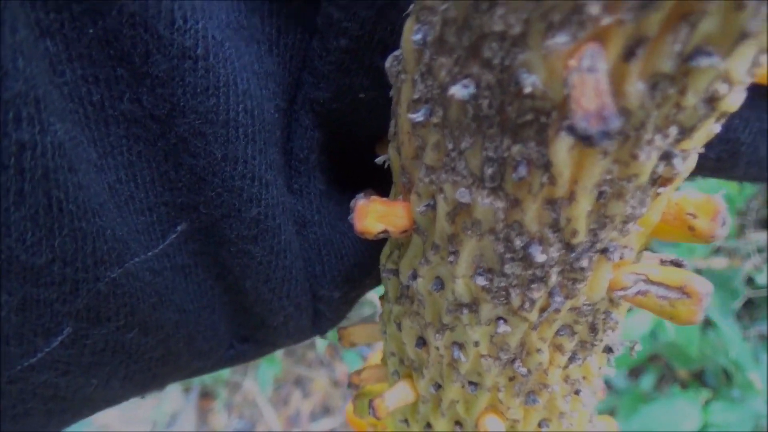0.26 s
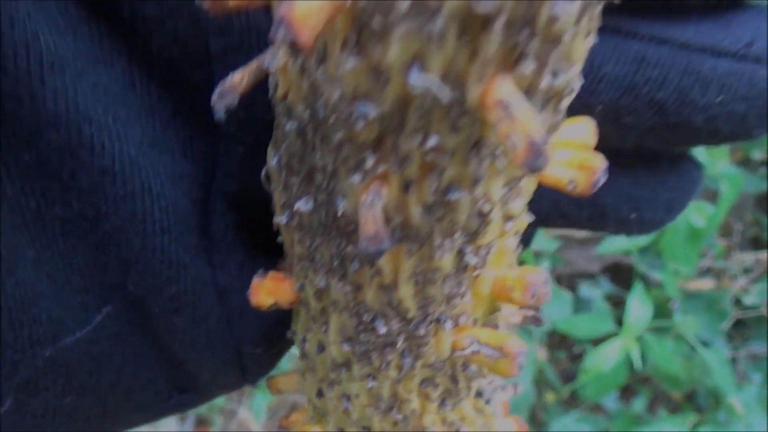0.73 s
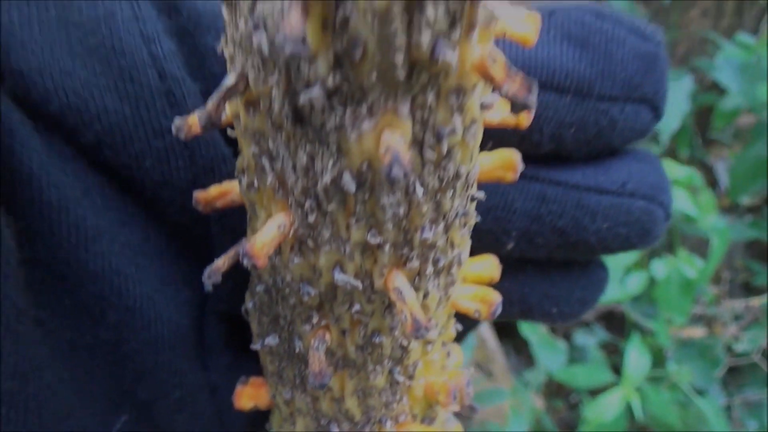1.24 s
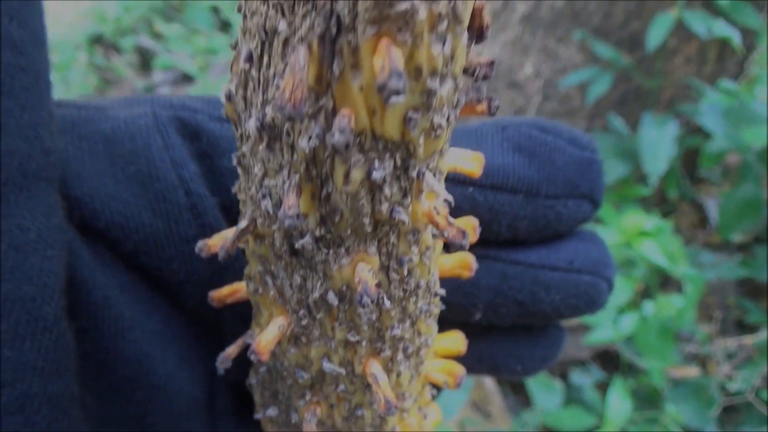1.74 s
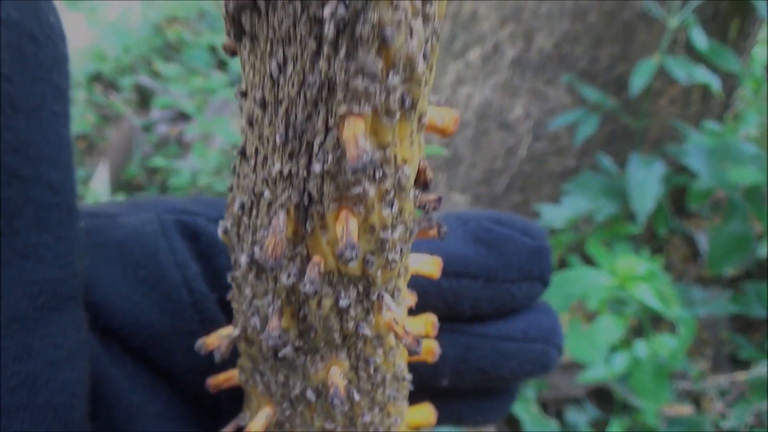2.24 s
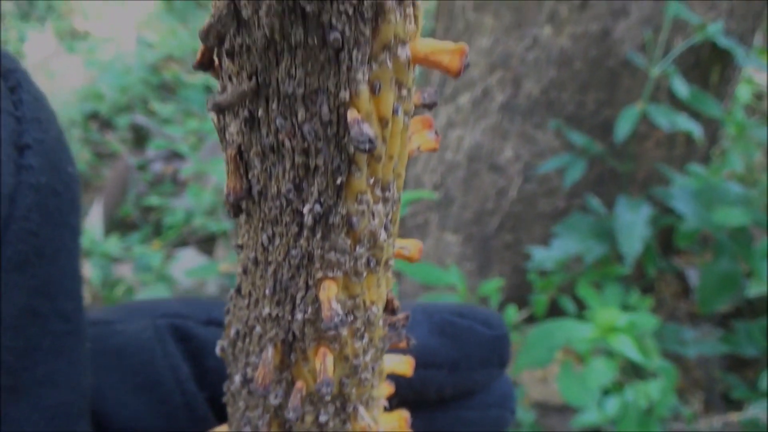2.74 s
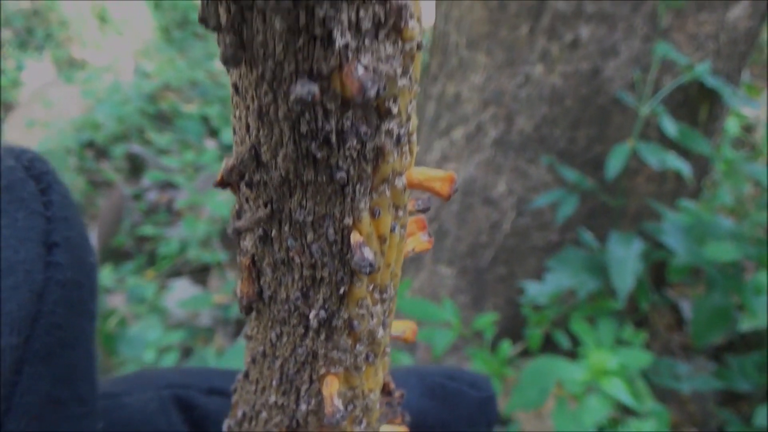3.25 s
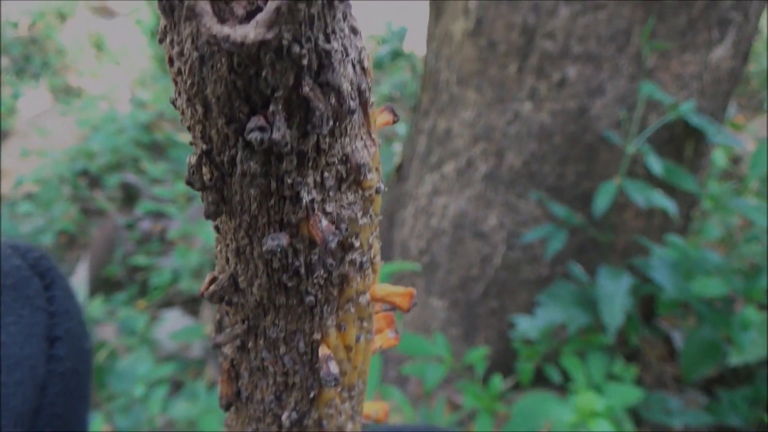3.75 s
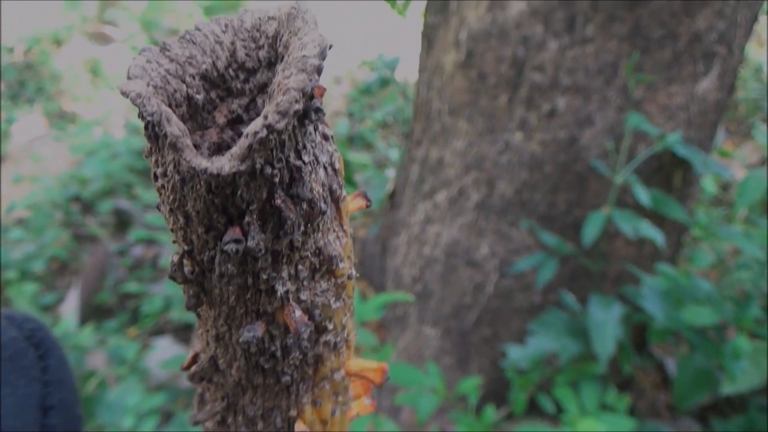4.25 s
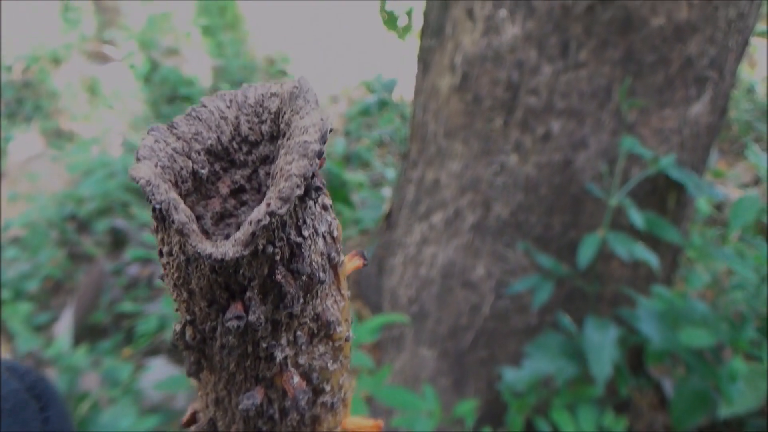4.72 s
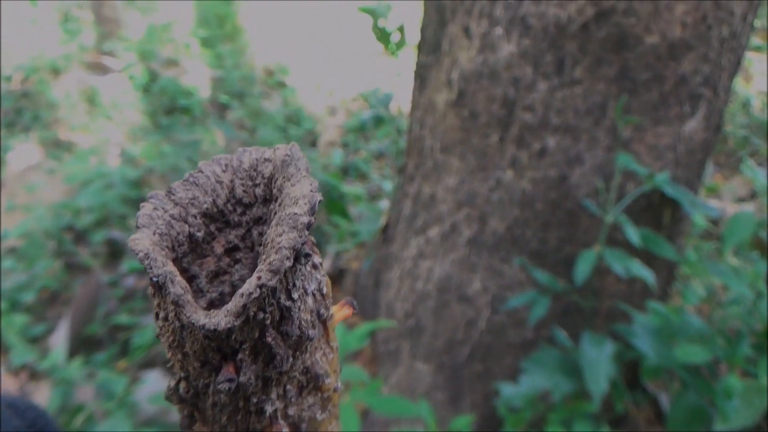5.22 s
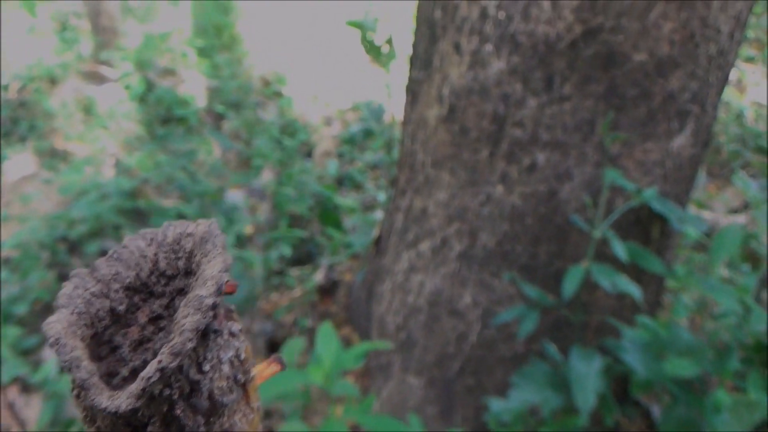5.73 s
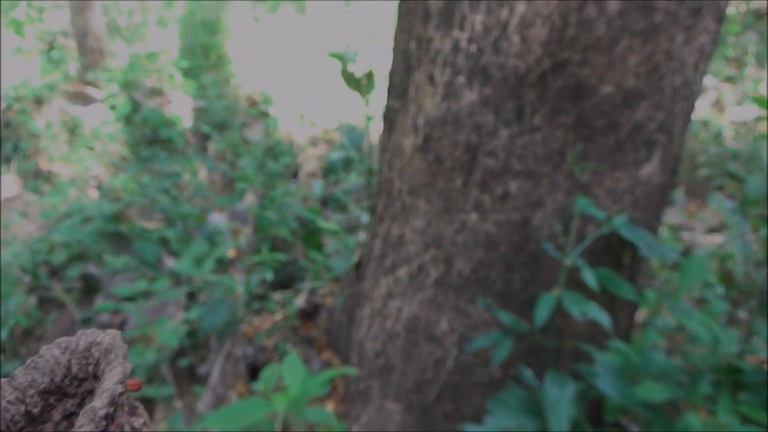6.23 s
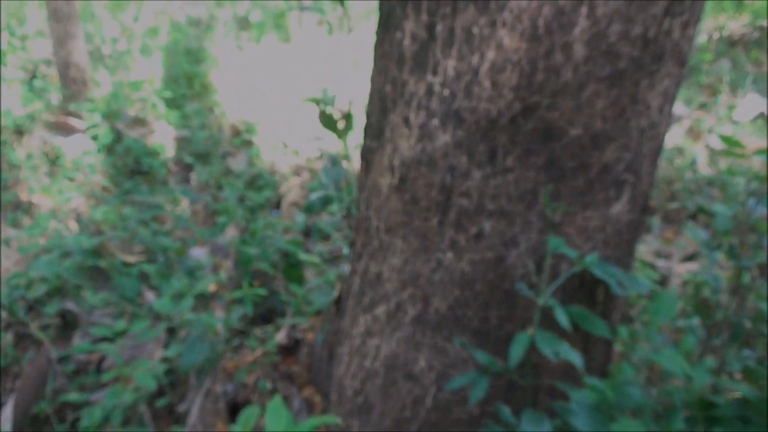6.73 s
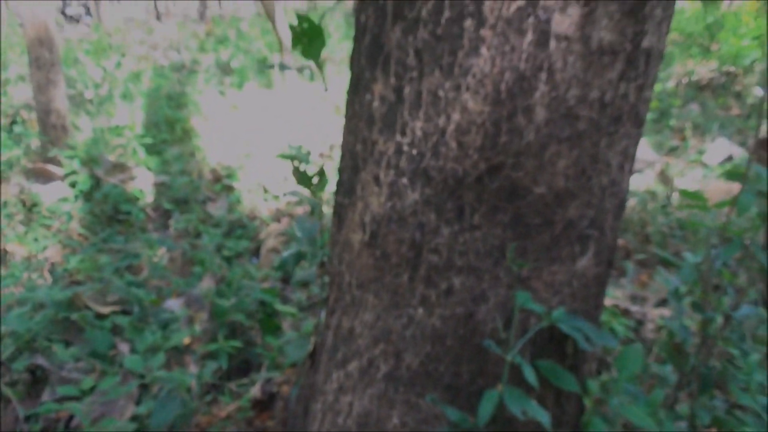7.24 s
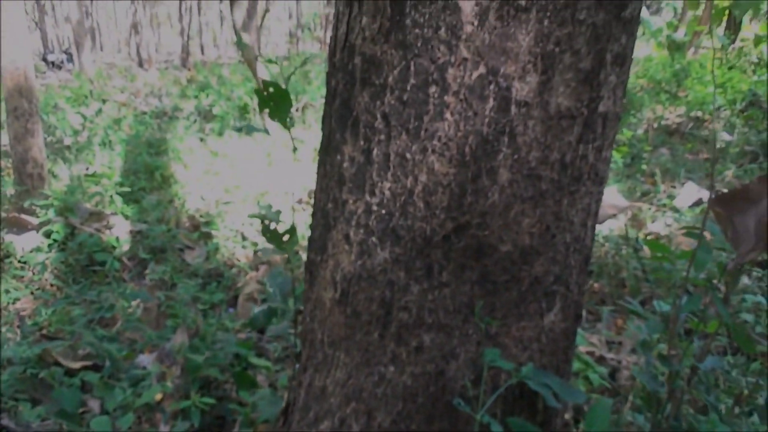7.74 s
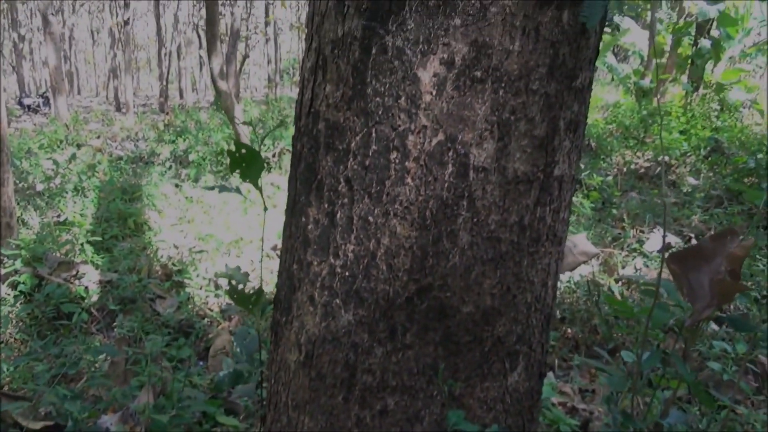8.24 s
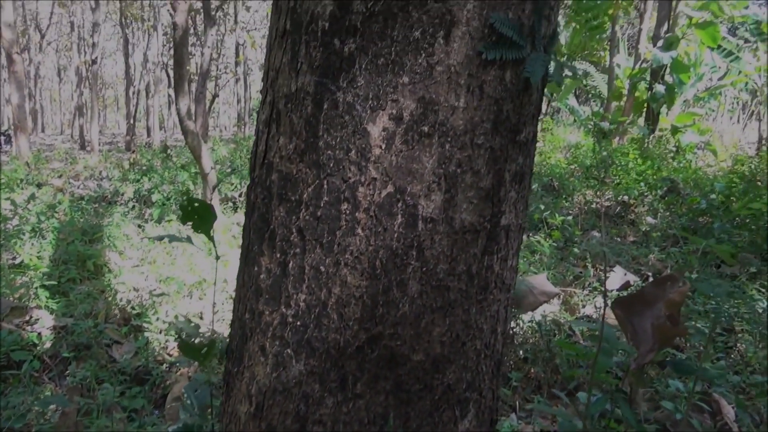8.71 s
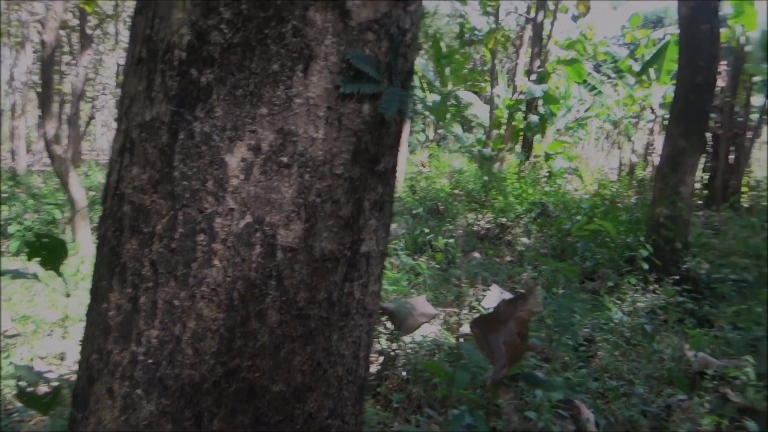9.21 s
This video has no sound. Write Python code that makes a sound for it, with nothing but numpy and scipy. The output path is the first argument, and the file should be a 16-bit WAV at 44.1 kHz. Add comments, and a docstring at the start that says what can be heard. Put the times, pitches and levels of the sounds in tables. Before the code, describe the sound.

Steady soft hiss of still woodland air with small faint bird chirps, then a sudden close, crackling rustle of dry leaves at the end.

```python
"""Even hiss over a far low drone, and small birds calling: a quiet wood by day.
Birds are gliding sines, scattered by random echoes off the trunks; the air is coloured noise.
The drone is a low sine beating with a narrow band of noise at the same pitch.
Leaves stir faintly throughout; late on something brushes through them close by, a swelling rustle
built from noise and tiny crackles, with a few sharp snaps of ringing noise."""
import sys
import numpy as np
from scipy import signal
from scipy.fft import rfft, irfft
from scipy.io import wavfile

SR = 44100
rng = np.random.default_rng(int(sys.argv[2]) if len(sys.argv) > 2 else 0)


def master(y):
    """Save y as 16-bit WAV."""
    cut = np.clip(np.atleast_2d(y).T, -1, 1)
    pcm = np.round(cut * 32767)  # scale
    wavfile.write(sys.argv[1], SR, pcm.astype(np.int16))


N = 417627
TIME = np.arange(N) / SR   # s
BINS = np.maximum(np.arange(N // 2 + 1) * SR / N, 1)   # Hz


def from_db(db):
    """Decibels to gain."""
    return 10 ** (np.asarray(db) / 20)


def rms_one(x):
    """Scale to unit power."""
    return x / np.sqrt(np.mean(x ** 2) + 1e-20)


def in_time(rows):
    """Each column of a curve at every sample."""
    s, *columns = np.transpose(rows)
    return [np.interp(TIME, s, column) for column in columns]


def over_bins(points):
    """A table over frequency, read on a log-frequency axis."""
    hz, value = np.transpose(points)
    return np.interp(np.log(BINS), np.log(hz), value)


def drift(rate, size=N):
    """Random wander: normal knots, rate per second, joined by straight lines."""
    knots = rng.standard_normal(size // 20 + 2)
    return np.interp(np.arange(size) * rate / SR, np.arange(len(knots)), knots)


def colour(x, spectrum):
    """Shape a signal with a spectrum, then scale it to unit power."""
    return rms_one(irfft(rfft(x) * from_db(over_bins(spectrum)), N))


def resonate(x, hz, width_hz):
    """A two-pole resonance with about unit gain at its peak."""
    r = np.exp(-np.pi * width_hz / SR)
    top = np.array([1, 0, -1]) * (1 - r * r) / 2
    bottom = [1, -2 * r * np.cos(2 * np.pi * hz / SR), r * r]
    return signal.lfilter(top, bottom, x + 1e-18)


def add(out, s, sound):
    """Mix a sound in at time s."""
    at = int(s * SR)
    out[..., at:at + sound.shape[-1]] += sound[..., :max(N - at, 0)]


# Stereo width of the diffuse field: [f/Hz, left-right likeness 0 to 1]
STEREO_LIKENESS = [(60, 0.58), (100, 0.75), (160, 0.67), (300, 0.4), (640, 0.23), (1410, 0.22),
                   (3100, 0.48), (6000, 0.83), (9000, 0.93), (13000, 0.95), (15500, 0.99)]


def spread(mid, side):
    """Two unrelated signals become a diffuse stereo field: the more alike the ears, the less side."""
    alike = np.clip(over_bins(STEREO_LIKENESS), 0, 1)
    m = irfft(rfft(mid) * np.sqrt((1 + alike) / 2), N)
    s = irfft(rfft(side) * np.sqrt((1 - alike) / 2), N)
    return np.array([m + s, m - s])


def birds(shade_hz=3200, direct_db=-1, foliage_db=-3, wood_db=-4, far_db=0):
    """Leaves shade the direct treble, so high notes arrive mostly scattered; far calls are all echo."""
    near = sing(bird_notes(), rasp_rate=700, bend=1.5)
    direct = signal.sosfilt(signal.butter(2, shade_hz, fs=SR, output="sos"), near)
    treble = signal.sosfilt(signal.butter(1, 2000, "high", fs=SR, output="sos"), near)
    foliage = trunks(treble, t60=.35, echoes_per_s=2500)
    wood = trunks(near, t60=.8, echoes_per_s=1500)
    far = trunks(far_calls(), t60=0.93, echoes_per_s=1500)
    near_mix = from_db(direct_db) * direct + from_db(foliage_db) * foliage + from_db(wood_db) * wood
    return near_mix + from_db(far_db) * far


# Bird tables: levels are those of the dry call, before shading and echoes.
# Nearest bird, "tee-chup", a falling lead-in and a lower note:
# [t/s, lead-in length/s, lower note f/Hz, lead-in level/dB, lower note level/dB]
TEE_CHUPS = [(3.361, .055, 1954, -47, -44.5), (3.612, 0.02, 2065, -38.5, -42),
             (4.188, 0.014, 1904, -50, -43), (4.436, .022, 2050, -43.5, -43),
             (4.738, 0.015, 1924, -51, -43)]
CHUP_S, CHUP_FALL, CHUP_RASP, LEAD_RATIO = .038, .11, .08, 1.16   # fall, rasp: shares of the pitch
# High bird slurring down to the same low note each time: [t/s, start f/Hz, level/dB]
DOWN_SLURS = [(0.81, 5530, -50.5), (1.08, 5730, -48.5), (1.375, 5340, -48), (6.545, 6350, -44.5),
              (6.825, 5410, -48)]
SLUR_S, SLUR_END_HZ, SLUR_RASP = .104, 3370, 0.0223
# Low bird, short raspy upward flicks: [t/s, middle f/Hz, level/dB]
RASPY_YIPS = [(0.765, 1430, -49), (1.235, 1320, -50), (1.495, 1300, -50), (1.765, 1260, -52),
              (1.89, 1300, -49.5), (2.099, 1590, -46.5), (2.335, 1430, -50), (2.69, 1350, -53),
              (5.56, 1950, -51), (6.19, 1600, -50.5), (7.235, 1820, -50.5), (7.85, 1630, -53),
              (8.335, 1600, -51)]
YIP_S, YIP_RISE, YIP_RASP = 0.04, 0.15, 0.087   # rise, rasp: shares of the pitch
# Thin whistles on a level pitch: [t/s, length/s, f/Hz, level/dB]
THIN_WHISTLES = [(1.472, 0.075, 3220, -51), (5.82, 0.073, 3155, -61), (7.102, 0.049, 2015, -53),
                 (7.413, 0.07, 3600, -55), (7.482, 0.11, 3570, -47)]
WHISTLE_RASP = 0.012
# Faint lisping notes high in the canopy: [t/s, length/s, f/Hz, level/dB]
CANOPY_LISPS = [(0.576, 0.022, 5830, -52), (2.27, .094, 5060, -53)]
LISP_RASP = 0.058
# Faint trill on one pitch: [t/s, f/Hz, level/dB]
FAINT_TRILLS = [(8.16, 3360, -52.5)]
TRILL_PERIOD_S, TRILL_NOTE_S = .042, .032
# Hoarse scolding, falling in pitch: [t/s, length/s, start f/Hz, end f/Hz, level/dB]
HOARSE_SCOLDS = [(3.127, 0.16, 3510, 2110, -51)]
SCOLD_RASP = .33


def bird_notes(trill_beats=6):
    """Each bird's habit as notes: (t/s, length/s, start f/Hz, end f/Hz, level/dB, rasp share)."""
    notes = []
    for s, lead_s, hz, lead_db, db in TEE_CHUPS:
        top, bottom = hz * (1 + CHUP_FALL / 2), hz * (1 - CHUP_FALL / 2)
        notes.append((s, lead_s, LEAD_RATIO * top, LEAD_RATIO * bottom, lead_db, CHUP_RASP))
        notes.append((s + lead_s, CHUP_S, top, bottom, db, CHUP_RASP))
    for s, hz, db in DOWN_SLURS:
        notes.append((s, SLUR_S, hz, SLUR_END_HZ, db, SLUR_RASP))
    for s, hz, db in RASPY_YIPS:
        notes.append((s, YIP_S, hz * (1 - YIP_RISE / 2), hz * (1 + YIP_RISE / 2), db, YIP_RASP))
    for s, length, hz, db in THIN_WHISTLES:
        notes.append((s, length, hz, hz, db, WHISTLE_RASP))
    for s, length, hz, db in CANOPY_LISPS:
        notes.append((s, length, hz, hz, db, LISP_RASP))
    for s, hz, db in FAINT_TRILLS:
        for k in range(trill_beats):
            notes.append((s + k * TRILL_PERIOD_S, TRILL_NOTE_S, hz, hz, db, WHISTLE_RASP))
    for s, length, start_hz, end_hz, db in HOARSE_SCOLDS:
        notes.append((s, length, start_hz, end_hz, db, SCOLD_RASP))
    return notes


def sing(notes, rasp_rate, bend):
    """Sine notes that glide fast at first, then settle; a quick pitch flutter makes some raspy."""
    out = np.zeros(N)
    for s, length, start_hz, end_hz, level_db, rasp in notes:
        u = np.linspace(0, 1, int(length * SR))
        flutter = drift(rasp_rate, size=SR)[:len(u)]
        glide = end_hz + (start_hz - end_hz) * (1 - u) ** bend
        effort = glide / np.mean(glide)   # a note weakens as its pitch falls
        swell = np.sqrt(np.abs(np.sin(np.pi * u))) * effort ** 2
        phase = 2 * np.pi * np.cumsum(glide * (1 + rasp * flutter)) / SR
        add(out, s, from_db(level_db) * swell * np.sin(phase))
    return out


# Long calls from deep in the wood: [t/s, length/s, level/dB at the opening accent]
DEEP_CALLS = [(4.37, 0.78, -51.5), (6.76, 1.08, -51.5)]
FAR_HZ, FAR_SAG_HZ_PER_S, FAR_RASP = 1190, 90, .024
FAR_ATTACK_S, FAR_ACCENT_S, FAR_HOLD_DB = .03, .17, -7.5   # hold is relative to the accent


def far_calls(rasp_rate=200):
    """Each call opens with an accent, then holds softly while its pitch sags."""
    out = np.zeros(N)
    for s, length, level_db in DEEP_CALLS:
        t = TIME[:int(length * SR)]
        hz = (FAR_HZ - FAR_SAG_HZ_PER_S * t) * (1 + FAR_RASP * drift(rasp_rate)[:len(t)])
        edges = np.minimum(np.minimum(t, length - t) / FAR_ATTACK_S, 1)
        accent_db = FAR_HOLD_DB * (1 - np.exp(-(t / FAR_ACCENT_S) ** 2))
        tone = np.sin(2 * np.pi * np.cumsum(hz) / SR)
        add(out, s, edges * from_db(level_db + accent_db) * tone)
    return out


def trunks(x, t60, echoes_per_s):
    """Trunks and foliage return many small echoes that die away; together as strong as the call."""
    hits = rng.random((2, N)) < echoes_per_s / SR
    echoes = rng.standard_normal((2, N)) * hits * from_db(-60 * TIME / t60)
    response = spread(*echoes)[:, :2 * SR]
    response /= np.sqrt(np.sum(response ** 2) / 2)
    return signal.fftconvolve(x[None], response, axes=1)[:, :N]


# How hard the leaves are moved, faint stir to close brushing: [t/s, swish and crinkle level/dB]
LEAF_PRESSURE = [(0, -54), (8.25, -51), (8.37, -44), (8.43, -46.5), (8.6, -39.5), (8.66, -35), (8.8, -39.5),
                 (8.94, -38), (8.97, -32.5), (9.03, -29.5), (9.125, -24.5), (9.19, -37.5), (9.22, -38.5),
                 (9.25, -28.5), (9.275, -32.5), (9.31, -28), (9.4, -34.5), (9.47, -32.5)]
# Bright spectrum of leaf edges: [f/Hz, relative level/dB per Hz]
LEAF_SPECTRUM = [(2000, -31), (3500, -18.5), (5800, -14.5), (7100, -8), (9900, -1), (12000, -4.5),
                 (14300, -9), (15800, -9)]
# Duller spectrum of the litter giving way: [f/Hz, relative level/dB per Hz]
LITTER_SPECTRUM = [(88, -51), (150, -30), (354, -1), (557, -6), (667, 0), (1330, -0.5), (1550, -4.5),
                   (2290, 0.5), (5500, -6.5), (7150, -10), (12100, -120)]
CRUNCH_DB, CRUNCH_GROWTH = -40.5, 0.98   # level at the breaking point; dB per dB of pressure


def rustle(breaking_db=-27, splinter_db=-9, splinters_per_s=90):
    """A light touch swishes; pressure makes leaf edges crinkle and the litter crunch."""
    pressure_db, = in_time(LEAF_PRESSURE)
    brittle = .75 / (1 + from_db(breaking_db - pressure_db))   # crinkle's share of the power
    swish = colour(spread(*rng.standard_normal((2, N))), LEAF_SPECTRUM)
    crinkle = colour(spread(*crackles(per_s=2400, size_db=4.0, ring_s=.0007)), LEAF_SPECTRUM)
    splinters = colour(spread(*crackles(splinters_per_s, size_db=5.0, ring_s=.0012)), LEAF_SPECTRUM)
    crunch = colour(spread(*crackles(per_s=900, size_db=1.5, ring_s=0.0048)), LITTER_SPECTRUM)
    leaves = np.sqrt(1 - brittle) * swish + np.sqrt(brittle) * crinkle
    leaves += from_db(splinter_db) * splinters
    crunch_db = CRUNCH_DB + CRUNCH_GROWTH * (pressure_db - breaking_db)
    return from_db(pressure_db) * leaves + from_db(crunch_db) * crunch


def crackles(per_s, size_db, ring_s):
    """Many tiny fractures of uneven size, each a noise burst that dies at once; mid and side."""
    happens = rng.random(N) < per_s / SR
    sizes = happens * from_db(size_db * np.minimum(rng.exponential(1, N), 4))
    power = signal.lfilter([1], [1, -np.exp(-2 / (ring_s * SR))], sizes ** 2 + 1e-18)
    return np.sqrt(power) * rng.standard_normal((2, N))


# Loudest leaves and stalks snapping: [t/s, crack gain/dB, ring f/Hz, knock gain/dB]
LEAF_SNAPS = [(8.857, -24, 9800, -48), (9.023, -10, 10400, -33), (9.082, -11.5, 10400, -29),
              (9.121, -18, 7950, -38), (9.182, -23, 9300, -33), (9.2244, -21, 10700, -32.5),
              (9.2499, -13.5, 10600, -30), (9.296, -14, 11000, -49), (9.307, -23, 10500, -42),
              (9.3173, -22, 8500, -41), (9.3314, -15, 8300, -45), (9.365, -16.5, 10600, -46),
              (9.3883, -13.5, 11000, -26.5)]


def snaps(crack_s=0.00091, tail_s=0.0099, tail_db=-12, width_hz=3800, knock_s=0.0024, side_db=-15):
    """A snap is a bright crack with a short ring, over the duller knock of the stalk."""
    out, t = np.zeros((2, N)), TIME[:SR // 20]
    dull = signal.butter(2, [450, 5500], "band", fs=SR, output="sos")
    for s, crack_db, hz, knock_db in LEAF_SNAPS:
        bright, low = rng.choice([-1., 1.], (2, 2, len(t)))   # random signs, mid and side
        crack = rms_one(resonate(resonate(bright, hz, width_hz), hz, 2 * width_hz))
        crack *= np.exp(-t / crack_s) + from_db(tail_db) * np.exp(-t / tail_s)
        knock = 2 * signal.sosfilt(dull, low * np.exp(-t / knock_s))
        mid, side = from_db(crack_db) * crack + from_db(knock_db) * knock
        add(out, s, mid + from_db(side_db) * side * np.array([[1], [-1]]))
    return out


# Uneven level of the far engine-like drone: [t/s, level/dB before the steady and scattered shares]
DRONE_LEVEL = [(0, -70), (0.85, -59.5), (1.15, -69), (1.4, -61), (2.0, -68.5), (2.3, -58), (2.5, -68.5),
               (3.4, -64.5), (3.9, -73), (4.6, -69.5), (5.1, -64), (5.45, -69), (6.25, -64.5), (7.1, -67.5),
               (8.25, -64.5), (8.9, -65.5), (9.47, -71)]
DRONE_HZ = 99.4


def drone(steady_db=-2, scattered_db=-4.5, scatter_hz=8):
    """One low tone and its scattered copy, which beat together into an uneven throb."""
    level_db, = in_time(DRONE_LEVEL)
    tone = np.sqrt(2) * np.sin(2 * np.pi * DRONE_HZ * TIME)
    narrow = resonate(rng.standard_normal(N), DRONE_HZ, scatter_hz)
    scattered = rms_one(resonate(narrow, DRONE_HZ, 2 * scatter_hz))
    return from_db(level_db) * (from_db(steady_db) * tone + from_db(scattered_db) * scattered)


# Still air of the wood: [f/Hz, relative level/dB per Hz]
AIR_SPECTRUM = [(76, -48), (140, -14.5), (228, -11.2), (350, -6.8), (520, -3.8), (730, -3.3), (950, -4.8),
                (1350, -6.4), (1900, -8.5), (3000, -11.6), (6600, -13.4), (10000, -7.4), (13300, -1.2),
                (15600, 1)]
AIR_DB = -39
# Faint rumble under it: [f/Hz, relative level/dB per Hz]
RUMBLE_SPECTRUM = [(25, -27), (45, -10), (70, 1), (110, 18), (150, -5), (220, -45)]
# Slow swell of the distant wash: [t/s, gain/dB on the air below the wash corner]
WASH_SWELL = [(0, 1), (2.2, 0.9), (4, 0.6), (4.7, 0.9), (5.4, 0.3), (6.2, 0), (6.9, 2), (9.47, 0.6)]


def air(waver_db=0.85, rumble_db=-72, wash_hz=6000):
    """Even hiss on top; below it a soft wash of distant sound that swells slowly, and a rumble."""
    swell_db, = in_time(WASH_SWELL)
    hiss = colour(spread(*rng.standard_normal((2, N))), AIR_SPECTRUM)
    hiss = hiss * from_db(AIR_DB + waver_db * drift(6.6))
    wash = irfft(rfft(hiss) / (1 + (BINS / wash_hz) ** 4), N)
    rumble = colour(spread(*rng.standard_normal((2, N))), RUMBLE_SPECTRUM)
    return hiss + (from_db(swell_db) - 1) * wash + from_db(rumble_db) * rumble


def scene():
    """The wood, with the leaves close to the microphone."""
    return birds() + rustle() + snaps() + drone() + air()


def record(dry, bass_hz=30, cutoff_hz=15800):
    """Deep bass is rolled off and the top is cut steeply."""
    thinned = signal.sosfilt(signal.butter(2, bass_hz, "high", fs=SR, output="sos"), dry)
    return signal.sosfilt(signal.ellip(12, .1, 80, cutoff_hz, fs=SR, output="sos"), thinned)


dry = scene()
out = record(dry)
master(out)
```